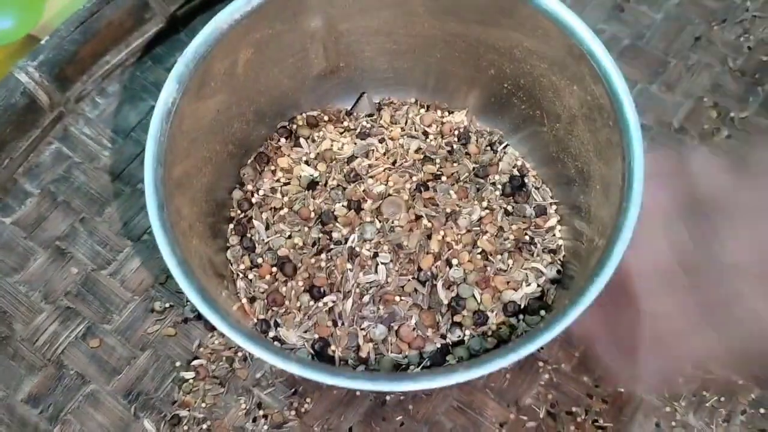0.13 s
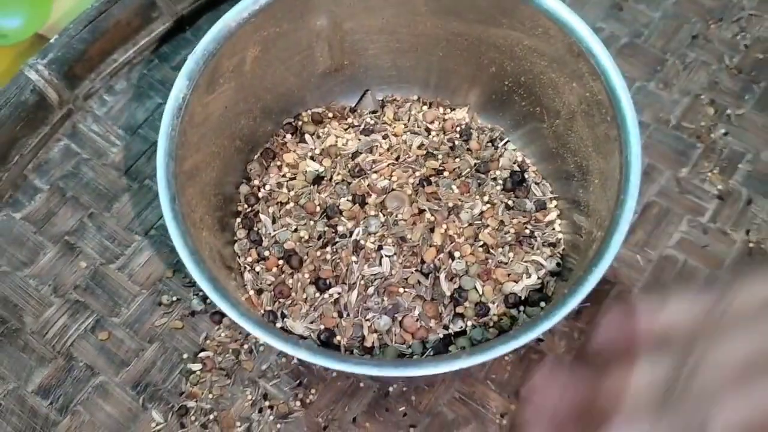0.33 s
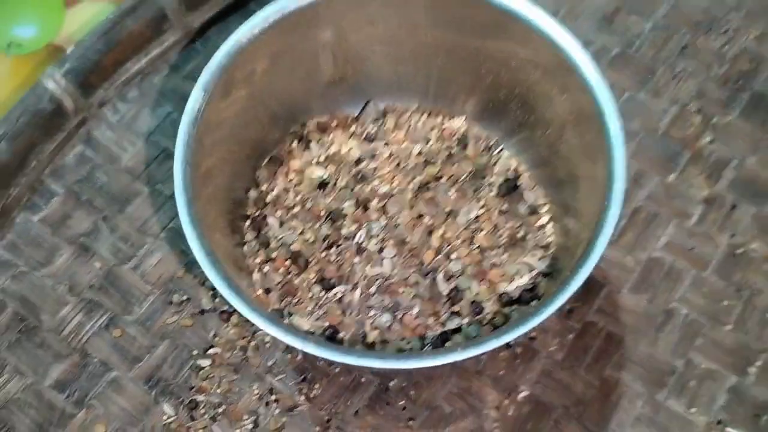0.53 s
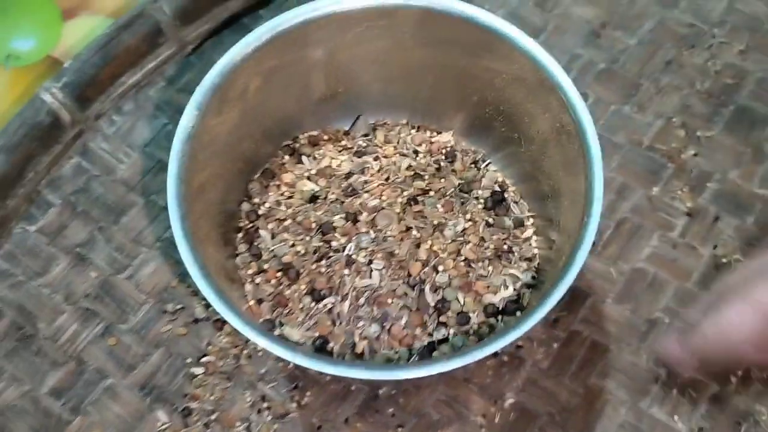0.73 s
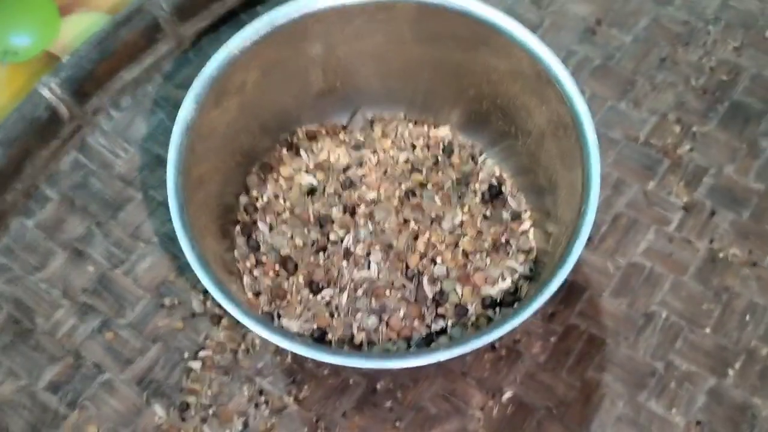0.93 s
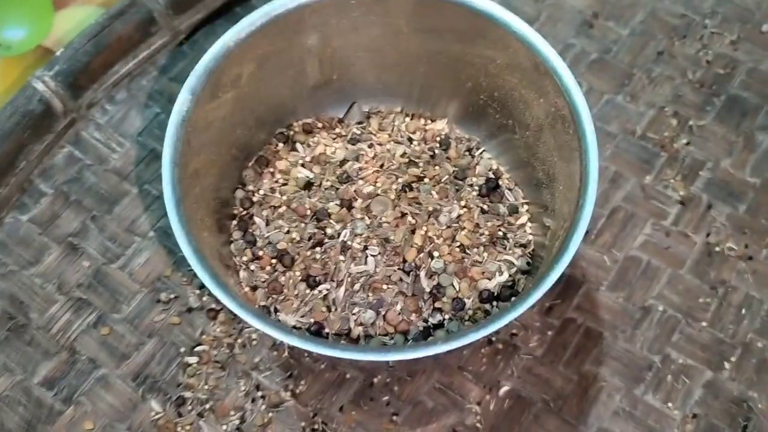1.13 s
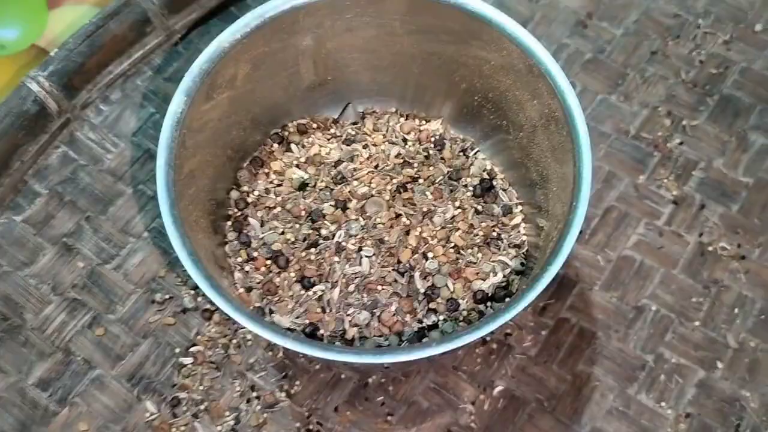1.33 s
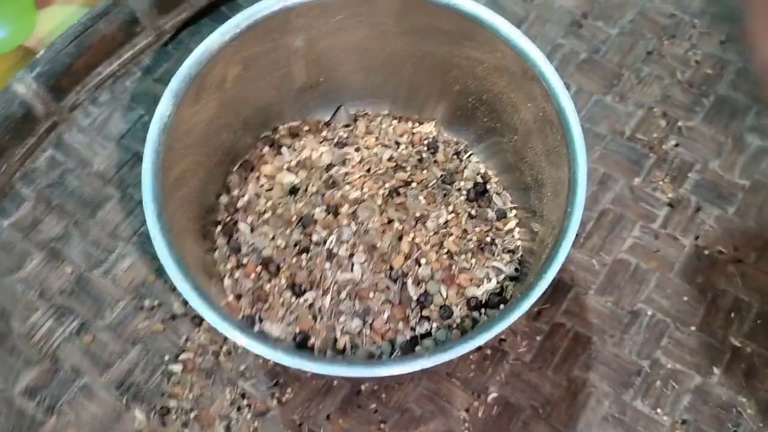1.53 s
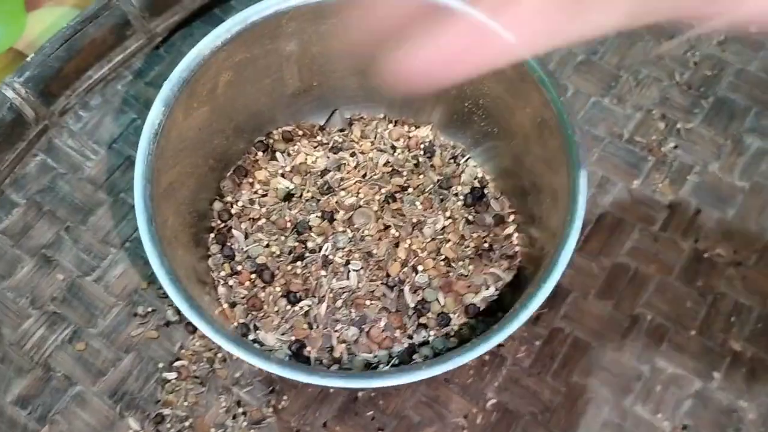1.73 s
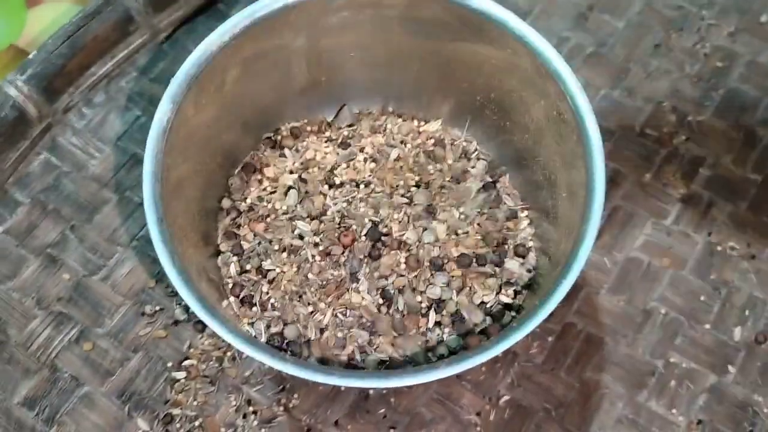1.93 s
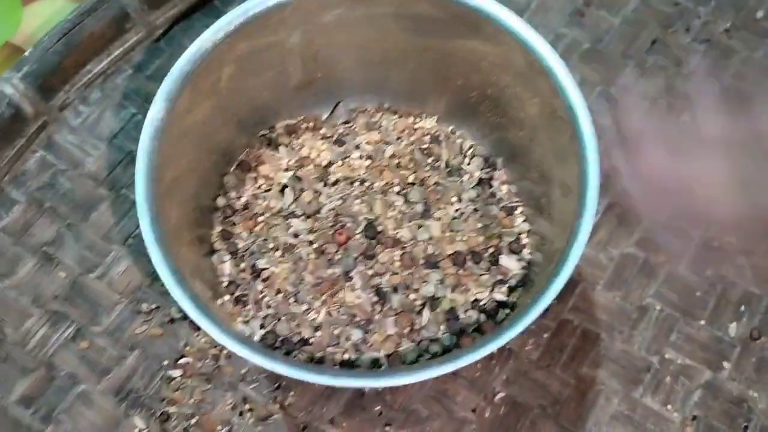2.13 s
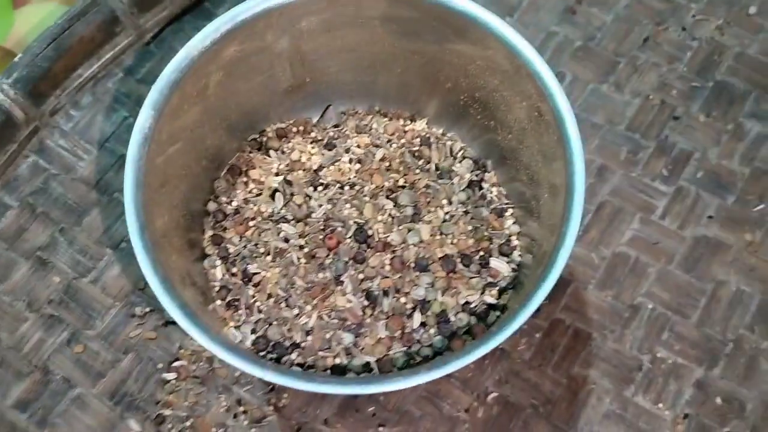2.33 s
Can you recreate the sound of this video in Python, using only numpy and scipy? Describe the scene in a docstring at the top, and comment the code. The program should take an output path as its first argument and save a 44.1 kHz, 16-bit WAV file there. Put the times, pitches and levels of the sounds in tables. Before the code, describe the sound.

Dry whole spices swept by hand over a woven tray, with a short bright patter in a metal bowl

```python
"""Dry seeds rattle first: a hand sweeps them across a woven bamboo tray in four strokes, with a pause before the last.
Shaped noise makes the seeds, the scraped weave and the tray's rumble; fading tones make the fingers' drumming.
Short cracks are stray seeds ticking, and a sliding band of hiss is a seed rolling out.
A pinch of seeds dropped into a steel bowl makes its tones ring, with patter and fizz on top.
A small quiet kitchen answers over a faint hush, and two spaced microphones hear it all."""
import sys
import numpy as np
from scipy import signal
from scipy.fft import rfft, irfft, next_fast_len
from scipy.io import wavfile
from scipy.ndimage import uniform_filter1d, map_coordinates

SR = 44100
rng = np.random.default_rng(int(sys.argv[2]) if len(sys.argv) > 2 else 0)


def level_to_linear(level):
    """Convert decibel levels to linear amplitude factors, elementwise."""
    exponent = np.asarray(level, float) / 20
    return 10 ** exponent


def to_wav(sig):
    """Store sig (one row per channel, or 1-D mono) as 16-bit WAV at the path in sys.argv[1].

    Samples outside -1..1 are clipped; the rate is SR.
    """
    pcm = np.clip(np.atleast_2d(sig), -1, 1) * 32767
    pcm = np.round(pcm).astype(np.int16)
    wavfile.write(sys.argv[1], SR, pcm.T)  # frames by channels


N = 110117  # length in samples
HZ = np.fft.rfftfreq(next_fast_len(N + 8192, True), 1 / SR)  # the pitches at which filters are drawn

# colour of the fizzing treble of many tiny impacts: pitch_hz, relative level_db (per Hz)
FIZZ_COLOUR = [(9000, -36), (10500, 2), (12000, 11.5), (13000, 1.5), (15500, 10.5), (16000, -25)]


def unit(x):
    """Scales a sound to an average (rms) level of one."""
    return x / np.sqrt(np.mean(x ** 2) + 1e-20)


def along(points, hz=HZ):
    """Joins (Hz, value) points with straight lines on a log pitch axis."""
    point_hz, value = np.transpose(points)
    return np.interp(np.log(hz + 1), np.log(point_hz + 1), value)


def curves(rows, outside=None):
    """Draws one smooth-running curve, a value per sample, for each column after the time."""
    time_s, *columns = np.transpose(rows)
    t = np.arange(N) / SR
    return [np.interp(t, time_s, column, outside, outside) for column in columns]


def lift(peaks):
    """Adds up the dB that resonances give, from rows of (Hz, width Hz, dB)."""
    return sum(db / (1 + ((HZ - hz) / width * 2) ** 2) for hz, width, db in peaks)


def filtered(x, response):
    """Multiplies the spectrum of a sound by a response drawn over HZ."""
    size = 2 * len(HZ) - 2
    return irfft(rfft(x, size) * response, size)[..., :N]


def causal(db):
    """Makes a filter with this gain that never sounds before its input (minimum phase)."""
    cepstrum = irfft(np.log(level_to_linear(db) + 1e-6))
    cepstrum[1:len(HZ) - 1] *= 2
    cepstrum[len(HZ):] = 0
    return np.exp(rfft(cepstrum))


def wobble(rate):
    """Draws a smooth random curve through a given number of random points a second."""
    points = rng.standard_normal(int(N * rate / SR) + 4)
    return map_coordinates(points, [np.arange(N) * rate / SR])


def contacts(rate, spread_db, smooth):
    """Makes two streams of tiny impacts (rate a second) of scattered size, over some smooth noise."""
    hit = rng.random((2, N)) < rate / SR
    size = level_to_linear(spread_db * rng.standard_normal((2, N))) * rng.standard_normal((2, N))
    return unit(hit * size) + smooth * rng.standard_normal((2, N))


def patchy(pair, depth_db):
    """Makes a sound uneven with random patches of gain over time and pitch."""
    z = signal.stft(pair, nperseg=256)[2]
    field = uniform_filter1d(rng.standard_normal(z.shape[1:]), size=4, axis=0)
    field = uniform_filter1d(field, size=5, axis=1)
    return signal.istft(z * level_to_linear(depth_db * unit(field)), nperseg=256)[1][:, :N]


def spread(pair, db):
    """Colours two streams and mixes them so low notes are alike left and right, high ones nearly separate."""
    # likeness of the two spaced microphones: pitch_hz, likeness (1 = the same)
    likeness = [(60, 1), (250, 0.93), (600, 0.68), (1200, 0.072), (3000, 0.05)]
    turn = np.arccos(np.clip(along(likeness), -1, 1)) / 2
    mid, side = filtered(pair, causal(db) * [np.cos(turn), np.sin(turn)])
    return unit(np.array([mid + side, mid - side]))


def sweeps():
    """Tiny impacts rattle as seeds, fingers scrape the strands and the whole tray rumbles under each stroke."""
    # the strokes, in groups of rows, as levels before the trims below:
    # time_s, seed_rattle_db, weave_scrape_db, tray_rumble_db, top_treble_db
    strokes = [
        [(0.0, -50, -65, -73, -74), (0.112, -38, -40.5, -42, -60.5), (0.21, -32.5, -36, -40, -55),
         (0.332, -35.5, -40.5, -37.5, -57), (0.4, -53.5, -64, -57.5, -71), (0.455, -55.5, -64, -59, -77),
         (0.495, -40.5, -43, -56.5, -62), (0.63, -33.5, -39, -36.5, -52)],
        [(0.66, -32, -37, -45.5, -55), (0.71, -33, -33.5, -45, -50.5), (0.8, -47.5, -56, -54.5, -74),
         (0.856, -47.5, -52, -57, -72), (0.986, -33, -39, -36.5, -59), (1.144, -33.5, -35, -31.5, -82),
         (1.194, -45.5, -50, -44.5, -76), (1.3, -52, -63, -75, -67.5)],
        [(2.17, -62, -73.5, -67, -75), (2.222, -50, -64.5, -59, -78), (2.262, -40, -43.5, -46, -64),
         (2.306, -35, -38.5, -42.5, -56.5), (2.444, -36.5, -41.5, -41.5, -60), (2.46, -38.5, -44.5, -49.5, -66),
         (2.497, -40.5, -44.5, -33, -66)],
    ]
    # the same columns, as seeds roll to rest
    settling = [(1.33, -58, -66, -65, -76), (1.416, -57, -71.5, -64.5, -76),
                (1.548, -65.5, -78.5, -58.5, -82), (1.766, -74, -84.5, -86, -103),
                (1.96, -77, -80, -81, -85), (2.12, -56.5, -74.5, -77, -91)]
    # colour of the seeds: pitch_hz, relative level_db (per Hz)
    seed_colour = [(1350, -41.5), (2300, -2.5), (2610, -1), (3210, -4.5), (3900, -2.5), (4690, -5.5),
                   (7020, -5), (9500, -24), (12400, -77), (20900, -120)]
    # colour of the scraped weave: pitch_hz, relative level_db (per Hz)
    weave_colour = [(300, -35), (500, 0), (900, 2.5), (1300, 0), (2000, -3.5), (2600, -32.5)]
    # colour of the tray's rumble: pitch_hz, relative level_db (per Hz)
    rumble_colour = [(25, -31), (60, -25), (120, -6), (170, -3.5), (280, -9), (380, -12), (600, -38.5)]
    # colour of the near space: pitch_hz, width_hz, lift_db
    near_space = [(2400, 230, -0.5), (3900, 610, 4.5), (5845, 290, 4.5), (7230, 170, 2)]
    # tray resonances: pitch_hz, width_hz, lift_db
    tray_resonances = [(138.4, 43, 2), (172.2, 3.7, 2.5), (233, 6.4, 13.5), (293.6, 65, 4), (360, 13, 4),
                       (760, 15, 1), (904, 110, 2)]

    seed_db, weave_db, rumble_db, top_db = curves(sorted(sum(strokes, settling)))
    bumps = wobble(29.5)  # shared by seeds, treble and weave

    rattle = contacts(6000, spread_db=1.5, smooth=1.0)
    strays = contacts(280, spread_db=2.5, smooth=0)
    grains = patchy(rattle + level_to_linear(-10) * strays, depth_db=1.5)
    seeds = spread(grains, along(seed_colour) + lift(near_space))
    top = spread(grains, along(FIZZ_COLOUR))

    scrape = patchy(contacts(1500, spread_db=0, smooth=1.0), depth_db=1.0)
    weave = spread(scrape, along(weave_colour) + lift(tray_resonances))
    rumble = spread(rng.standard_normal((2, N)), along(rumble_colour) + lift(tray_resonances))

    bright = level_to_linear(0.86 * bumps) * (level_to_linear(seed_db + 3.5) * seeds + level_to_linear(top_db + 1.0) * top)
    weave_gain = level_to_linear(weave_db + 2.5 + 0.82 * bumps + 1.28 * wobble(45.12))
    rumble_gain = level_to_linear(rumble_db - 2.0 + 2 * wobble(24.86))
    return bright + weave_gain * weave + rumble_gain * rumble


def taps():
    """Soft blows, mostly fingers, ring the tray's own tones; the hand damps them more or less."""
    # the blows: start_s, relative level_db, brightness in dB an octave, share of the free ring time
    blows = [(0.105, -28, 10, 0.31), (.673, -26.5, 8, 0.68), (1.261, -41.5, 5.5, 0.68), (1.442, -41, -5, 1),
             (2.111, -60, 13.5, 0.97), (2.125, -43.5, 11.5, 0.8), (2.205, -36, 6, 0.27),
             (2.254, -31, 13.5, 0.3), (2.461, -18.5, 9, 0.5)]
    # tones of the tray: pitch_hz, relative level_db, free ring time_s (to fall 60 dB)
    tray_tones = [(125.7, -16.5, 0.83), (224.7, -3.5, 0.19), (262.3, -1, 0.14), (470, -14, 0.083),
                  (691, -18.5, 0.057), (916, -12.5, 0.03), (1733, -37.5, 0.042)]
    level_db, scatter_db, attack_cycles = -3, 2, 0.68

    out, t = np.zeros(N + SR), np.arange(SR // 2) / SR
    for start_s, blow_db, bright_db, share in blows:
        ring = 0
        for hz, tone_db, ring_s in tray_tones:
            start_db = tone_db + bright_db * np.log2(hz / 250) + rng.normal(0, scatter_db)
            fade = level_to_linear(start_db - 60 * t / ring_s / max(share, .05))
            onset = 1 - np.exp(-t * hz / attack_cycles)
            ring = ring + fade * np.sin(2 * np.pi * hz * t) * onset
        out[round(start_s * SR):][:len(t)] += level_to_linear(blow_db + level_db) * ring
    return out[:N]


def bowl():
    """Seeds rain on steel: each tone gathers energy from the rain and lets it die, under patter and fizz."""
    # the pour, before the trims below: time_s, drive of the ring_db, patter_db, fizz_db
    pour = [(1.96, -110, -102, -101), (1.972, -100, -60, -69), (1.994, -72, -59, -69),
            (2.004, -51.5, -49.5, -62), (2.03, -77, -54.5, -58), (2.046, -45, -44, -54.5),
            (2.062, -60, -51, -52), (2.074, -44.5, -43, -57), (2.114, -57, -58, -61), (2.14, -68, -54, -68),
            (2.202, -80, -69, -97), (2.24, -90, -79, -75)]
    # tones of the bowl: pitch_hz, level_db (only differences count)
    bowl_tones = [(2320, -49), (2363, -52), (2627, -55), (3435, -58), (3784, -56.5), (4290, -49.5),
                  (4764, -62), (4980, -59), (5556, -55), (6024, -51), (6557, -71), (6982, -58),
                  (7058, -53.5), (7327, -62), (7876, -78), (8172, -74)]
    # colour of the patter: pitch_hz, relative level_db (per Hz)
    patter_colour = [(2600, -45), (3900, -2), (5200, 5), (7200, 8.5), (8500, 1), (9200, -12.5)]
    lowest_ring_s, damping = 0.5, 0.7  # ring time falls as pitch to the power of damping
    skew, wander = 0.8, 0.8  # radians of phase scatter between microphones, and over time
    flutter_db = 2.5

    ring_db, patter_db, fizz_db = curves(pour, -140)
    t, ring = np.arange(N) / SR, 0
    loudest = max(db for hz, db in bowl_tones)
    for hz, db in bowl_tones:
        ring_s = lowest_ring_s * (bowl_tones[0][0] / hz) ** damping
        keep = level_to_linear(-2 * 60 / (ring_s * SR))  # share of energy kept each sample
        rain = level_to_linear(2.03 * (ring_db + 2.1 * wobble(60)))
        energy = signal.lfilter([1 - keep], [1, -keep], rain)
        level = level_to_linear(db - loudest + flutter_db * wobble(70)) * np.sqrt(energy)
        phase = wander * wobble(60) + rng.uniform(0, 2 * np.pi) + rng.normal(0, skew, (2, 1))
        ring = ring + level * np.sin(2 * np.pi * hz * t + phase)

    # many small tones: random bumps along pitch, in dB
    small = uniform_filter1d(rng.standard_normal(len(HZ)), size=70)
    small = 7 * unit(uniform_filter1d(small, size=70))
    patter = spread(contacts(5200, 2.8, smooth=0.8), along(patter_colour) + small)
    fizz = spread(contacts(3000, 3.4, smooth=0.91), along(FIZZ_COLOUR))
    return level_to_linear(6.5) * ring + level_to_linear(patter_db + 2.0) * patter + level_to_linear(fizz_db) * fizz


def ticks():
    """A single seed lands: a crack and a short rattle, with its own share of body and treble."""
    # the landings: start_s, relative level_db, treble_db and body_db against the middle
    landings = [(0.067, -20.5, 2.5, 4), (0.396, -29, -1, -8), (1.2645, -25, -3, 5), (1.459, -34, 5, -15),
                (1.485, -29, 0.5, -13), (1.5262, -34, 4, -28), (1.542, -35.5, 9.5, -18),
                (1.706, -46, 9, -10), (1.7299, -21.5, 0, 3), (1.741, -31.5, -14, 3), (1.802, -47, 15, -8),
                (1.8656, -26, -1.5, -0.5)]
    # colour of a landing: pitch_hz, relative level_db
    tick_colour = [(600, -19), (850, -5.5), (1150, -29), (1600, -4), (2200, -10.5), (4200, 6.5),
                   (5300, -0.5), (6900, 2.5), (9000, -18), (16000, -47)]
    level_db, rattle_db, rattle_s = 6.5, -13, 0.022  # rattle_s: time to fall 60 dB

    bands, t = np.zeros((3, 2, N)), np.arange(2000) / SR  # body, middle, treble
    for start_s, db, treble_db, body_db in landings:
        rattle = rng.standard_normal((2, len(t))) * level_to_linear(rattle_db - 60 * t / rattle_s)
        crack = rattle + (t == 0)
        shares = level_to_linear([[[body_db]], [[0]], [[treble_db]]])
        bands[:, :, round(start_s * SR):][..., :len(t)] += crack * level_to_linear(db + level_db) * shares

    low = 1 / (1 + (HZ / 2200) ** 6)
    high = 1 / (1 + (5300 / (HZ + 1)) ** 6)
    out = 0
    for band, share in zip(bands, [low, 1 - low - high, high]):
        share_db = 20 * np.log10(abs(share) + 1e-4)
        out = out + filtered(band, causal(along(tick_colour) + share_db))
    return out


def roll():
    """A band of hiss slides in pitch as a seed rolls out: slow noise carried by a gliding tone."""
    # the rolling seed: time_s, pitch_hz, level_db
    path = [(1.2, 4030, -54), (1.43, 3950, -59.5), (1.48, 3660, -52.5), (1.57, 3470, -57.5),
            (1.63, 3450, -70), (1.72, 3590, -64), (1.8, 3600, -83)]
    hz, db = curves(path, -140)
    slow = filtered(rng.standard_normal((2, 2, N)), np.exp(-(HZ / 480) ** 2))
    turn = 2 * np.pi * np.cumsum(hz) / SR
    hiss = unit(slow[0] * np.cos(turn) + slow[1] * np.sin(turn))
    return level_to_linear(db + 2.0 * wobble(38.97)) * hiss


def kitchen(x):
    """The room answers with fading noise in which each pitch dies at its own speed."""
    # how long the room rings: pitch_hz, time_s to fall 60 dB
    fade_times = [(200, 0.25), (2000, 0.19), (5000, 0.22), (10000, 0.38)]
    hz, t, z = signal.stft(rng.standard_normal((2, SR // 2)), SR, nperseg=256)
    fade = level_to_linear(-60 * t / along(fade_times, hz)[:, None])
    tail = signal.istft(z * fade, SR, nperseg=256)[1]
    return signal.fftconvolve(x, tail / np.linalg.norm(tail[0]), axes=1)[:, :N]


def hush():
    """A faint steady background, made of coloured noise."""
    # colour of the hush: pitch_hz, relative level_db (per Hz)
    hush_colour = [(18, -54), (30, -22), (59, 11), (740, -5.5), (1070, -18), (1160, -45), (16000, -16)]
    return level_to_linear(-80) * spread(rng.standard_normal((2, N)), along(hush_colour))


def scene():
    """Adds all the sources; the room answers the ticks and, more softly, the taps."""
    seeds, blows = ticks(), taps()
    answer = level_to_linear(-5) * kitchen(seeds + level_to_linear(-7.5) * blows)
    return sweeps() + roll() + bowl() + seeds + blows + answer + hush()


def roll_off(x):
    """The treble ends steeply here."""
    return signal.sosfilt(signal.butter(12, 15850, fs=SR, output="sos"), x)


def record(dry):
    """The two microphones differ in colour, and the left one hears slightly later."""
    # colour difference: pitch_hz, left over right level_db
    left_over_right = [(100, 0), (400, 2), (800, -0.5), (2500, 5.5), (5500, -2), (9000, 0), (14000, -3.5)]
    lag_s = 0.0001
    side = np.array([[.5], [-.5]])  # half the difference to each microphone
    colour = level_to_linear(along(left_over_right) * side)
    delay = np.exp(-2j * np.pi * HZ * lag_s * side)
    mix = filtered(dry, colour * delay)
    return roll_off(mix)


dry = scene()
out = record(dry)
to_wav(out)
```